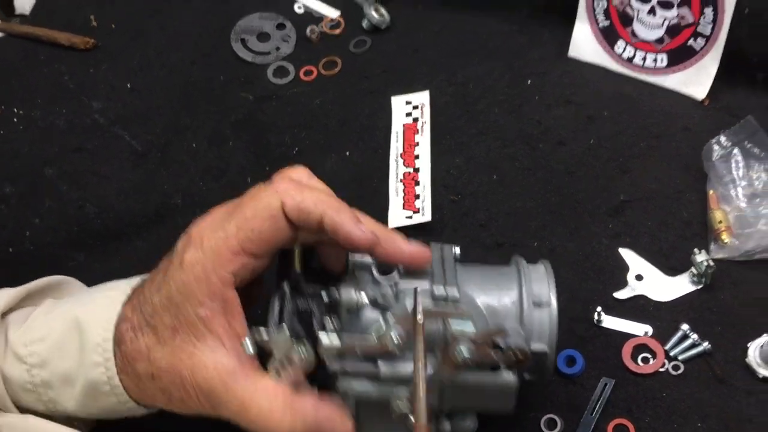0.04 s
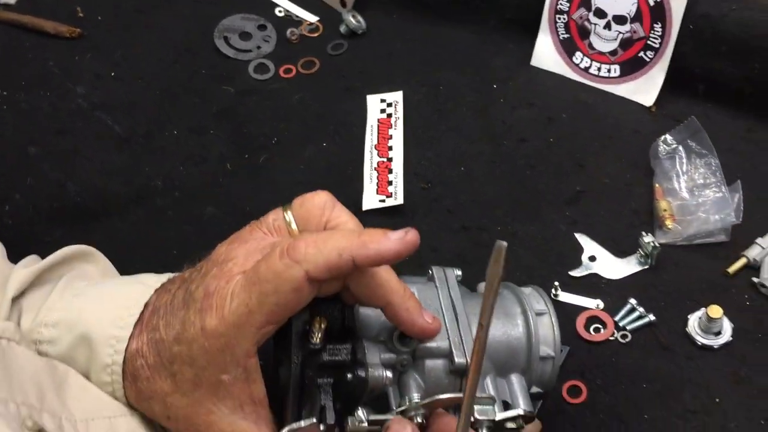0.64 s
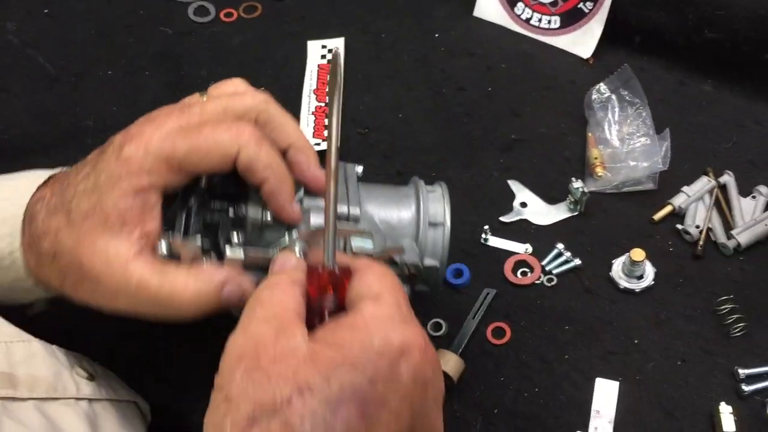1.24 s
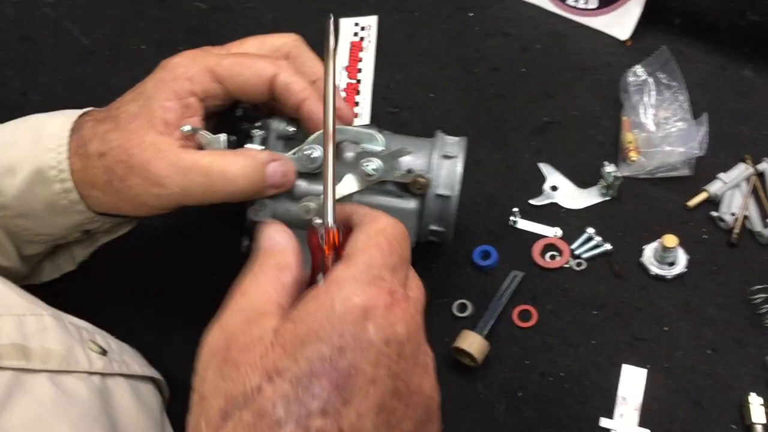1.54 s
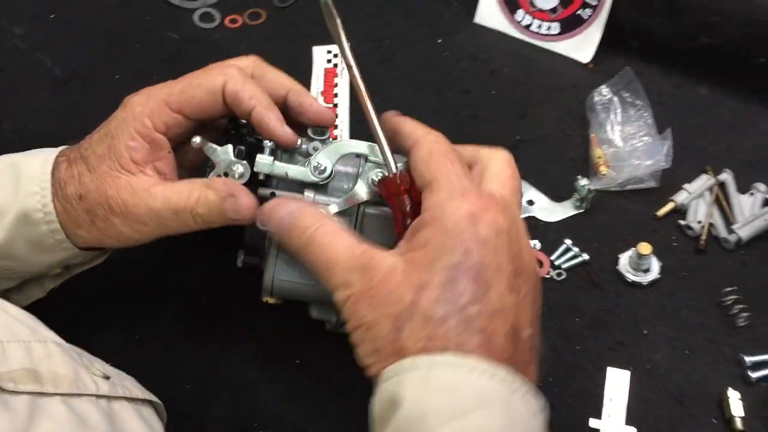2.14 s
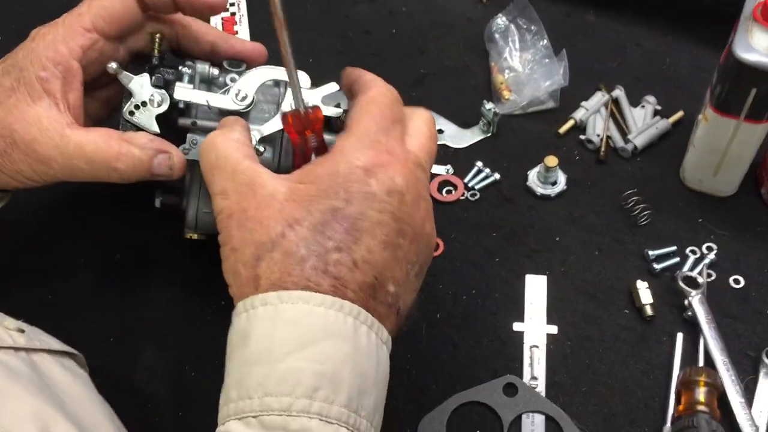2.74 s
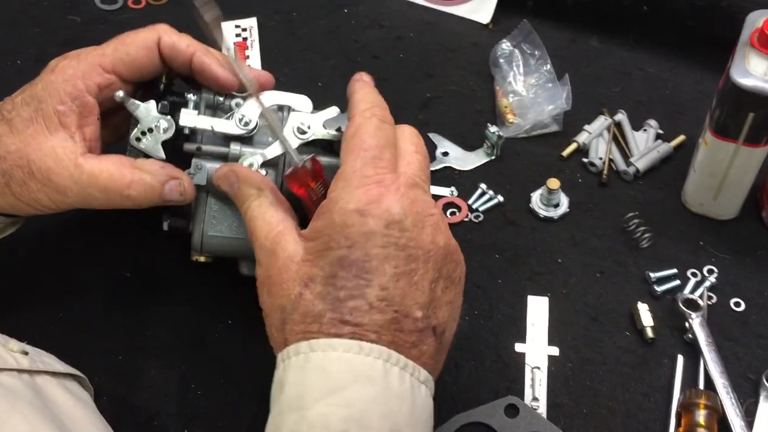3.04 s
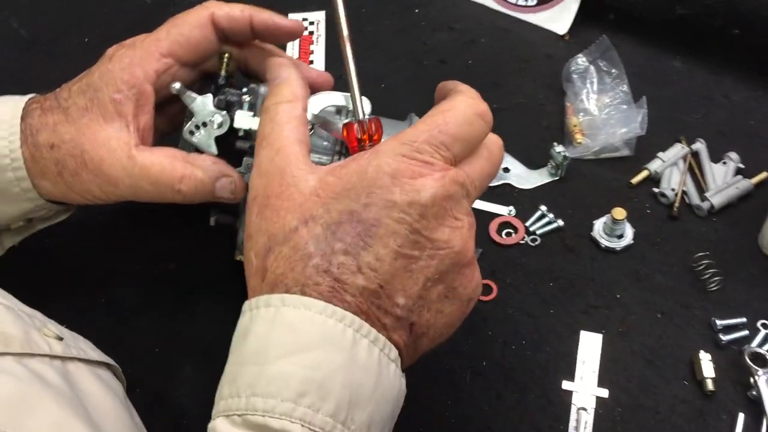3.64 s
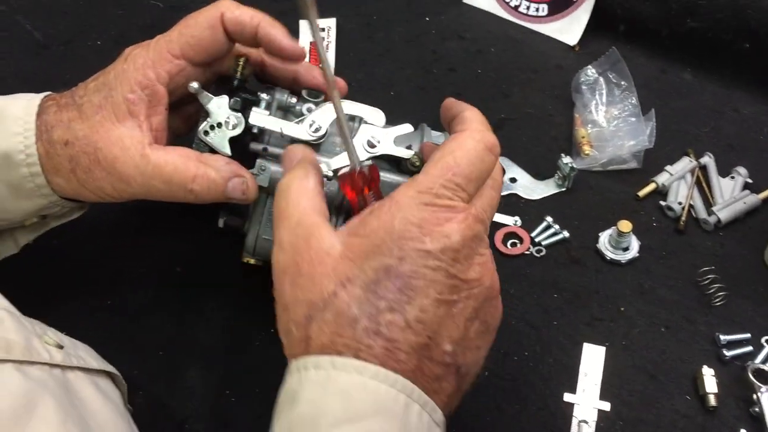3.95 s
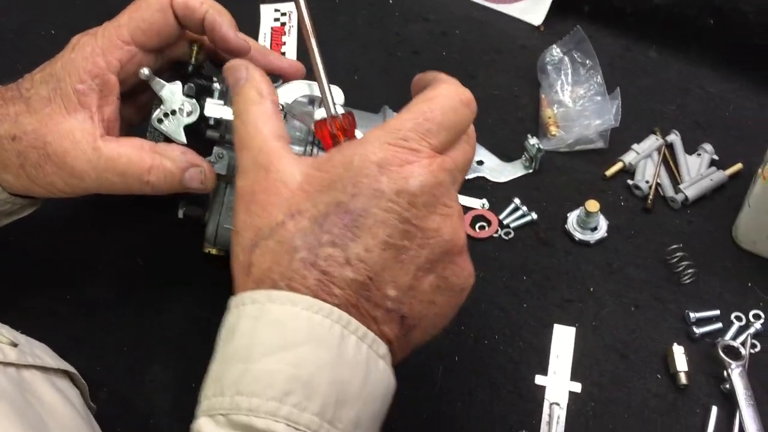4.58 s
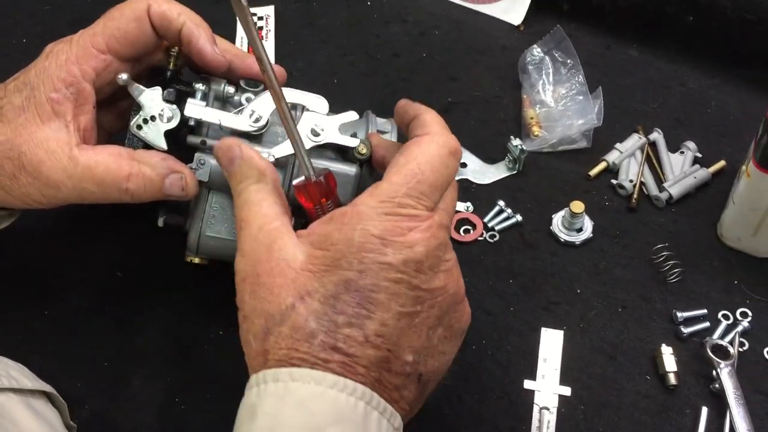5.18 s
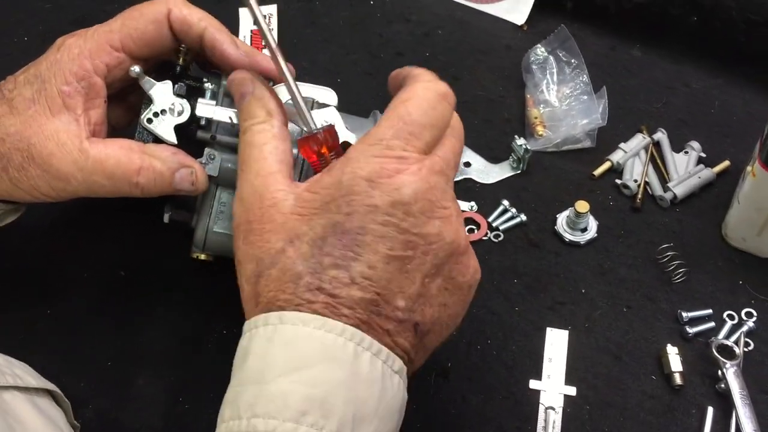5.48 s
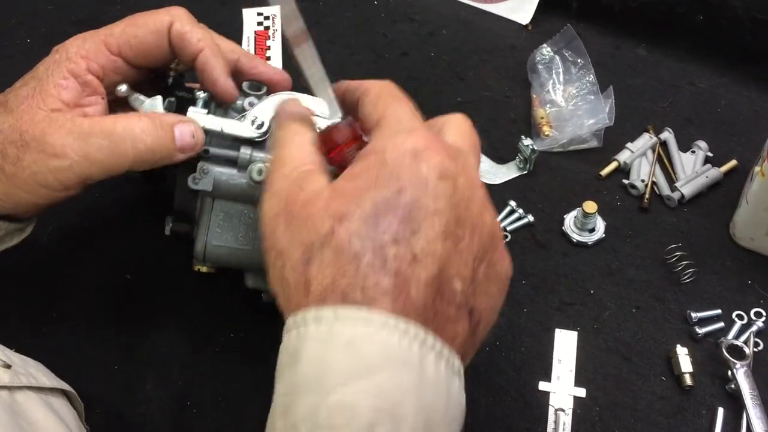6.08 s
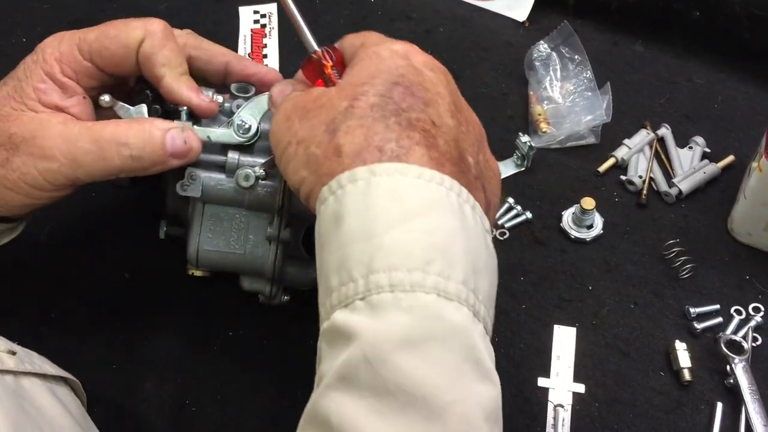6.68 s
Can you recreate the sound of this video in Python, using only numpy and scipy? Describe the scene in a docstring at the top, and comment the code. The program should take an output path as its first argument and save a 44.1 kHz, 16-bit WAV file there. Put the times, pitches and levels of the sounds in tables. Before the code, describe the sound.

A dull knock and a thin scrape, then small clusters of sharp metallic clicks as a screwdriver twists a carburetor screw over low hum.

```python
"""A screwdriver turns a small screw on a hand-held carburettor, close by, in a quiet, humming workshop.
First tool and linkage tick lightly. At 1.5 s the casting knocks on the covered bench, jolting loose parts,
and the small room booms. The blade then drags toward the slot, scraping and singing by stick-slip friction.
From about 3.3 s come six twists: in each the blade grinds and snaps against the slot two or three times,
and every impact excites the bright modes of the steel parts and the dull ones of the hollow casting."""
import sys
import numpy as np
from scipy import signal
from scipy.fft import rfft, irfft
from scipy.io import wavfile
from scipy.ndimage import uniform_filter1d

SR = 44100
rng = np.random.default_rng(int(sys.argv[2]) if len(sys.argv) > 2 else 0)


def unload_wav(signal):
    """Save mono or channel-first audio to the path in sys.argv[1] as 16-bit WAV at rate SR, clipped to [-1, 1]."""
    wavfile.write(
        sys.argv[1],
        SR,
        np.round(np.clip(np.atleast_2d(signal).T, -1, 1) * 32767).astype(np.int16),
    )


N = 305172
RING_S = np.arange(SR // 3) / SR  # time since a blow

# machine hum and a faint whine: pitch_hz, rms_db, waver_db
HUM_PARTIALS = [(50.9, -46.5, 0.8), (99.9, -56.5, 4.5), (112.4, -58, 2.5), (149.5, -65, 3),
                (202.2, -70.5, 4.5), (261.6, -68.5, 3), (3554, -86.5, 0.8)]
# spectra of the workshop's still air and of its reflections: frequency_hz, gain_db
AIR_SPECTRUM = [(20, -28.5), (40, -12), (70, 1.5), (110, -0.5), (170, -8), (290, -7.5), (380, -18),
                (520, -26), (1200, -29.5), (2800, -36.5), (4200, -39), (9000, -43), (10500, -45.5),
                (16000, -46.5)]
ROOM_SPECTRUM = [(80, -2.5), (300, 6), (800, 5.5), (3000, 2), (7500, -0.5), (11000, -1.5), (16000, -9)]
# modes of the room and of the bench top under its cloth: pitch_hz, gain_db, t60_s
ROOM_MODES = [(98, -25.5, 0.2), (103.7, -28, 0.2)]
BENCH_MODES = [(77, -10.5, 0.022), (94.7, -13.5, 0.17), (122, -37, 0.079), (194.7, -16, 0.067),
               (236, -20.5, 0.096), (305.5, -19.5, 0.088), (418, -28.5, 0.081), (670, -30, 0.074),
               (1040, -26, 0.017)]
# loose parts jolted by the knock: start_s, level_db, centre_hz, width_octaves, t60_s
LOOSE_PARTS = [(1.5208, -32, 1620, 0.34, 0.017), (1.5202, -29.5, 3800, 0.66, 0.036),
               (1.5285, -32, 790, 1.26, 0.094)]
# light touches of tool and linkage: start_s, level_db, centre_hz, width_octaves
LIGHT_TOUCHES = [(0.353, -52.5, 1530, 1.24), (1.2889, -44.5, 1660, 1.04), (1.4156, -61.5, 4770, .8),
                 (1.6976, -48.5, 2360, 0.6), (1.9108, -50, 3000, 3), (2.0366, -65, 7000, 0.54),
                 (2.316, -42.5, 1780, 1.53), (2.611, -55.5, 2120, .45), (4.852, -49.5, 2600, 1.3),
                 (5.286, -48.5, 3500, 6)]
# scrape of the blade seeking the slot: time_s, level_db
DRAG_LEVELS = [(1.53, -83), (1.72, -67), (1.765, -55), (1.81, -66.5), (1.903, -70.5), (1.913, -48),
               (1.945, -44.5), (1.96, -55.5), (2.02, -71), (2.12, -94), (2.33, -85), (2.42, -76.5),
               (2.68, -83), (2.75, -75), (2.85, -100)]
# resonances of the dragged steel: centre_hz, width_octaves, gain_db
SINGING_BANDS = [(2300, .14, 3.5), (4100, 0.14, -4)]
# grinding grows with force, then levels off: force_db, level_db
GRIND_BY_FORCE = [(-50.5, -71.5), (-37, -64.5), (-29.5, -51.5), (-15, -48.5)]
# modes of the hollow casting, damped by the hand: pitch_ratio, gain_db, t60_s
CASTING_MODES = [(.5, -7, 0.018), (.88, 2, 0.015), (1.04, 3, 0.02), (1.32, -5, .028), (1.6, -11, 0.0095)]
# a harder blow sounds the casting lower, down to its deepest note: level_db, pitch_hz
PITCH_BY_LEVEL = [(-41.5, 1050), (-29.5, 831), (-26, 680)]
# clearest modes of the steel parts: pitch_hz, gain_db, t60_s
LEVER_RING = [(1375, -3, .026), (1745, 0, .028), (1880, -4, .022)]
SHAFT_RING = [(2310, -3, .026), (2622, -1, .04), (2895, 0, .042), (3090, 0, .034), (3370, -4, .035),
              (4250, -3, .042), (4580, -6, .026), (5065, -2, .03)]
TIP_RING = [(5855, -5, .033), (6230, -4, .027), (6830, -1, .03), (7070, 0, .034), (7350, -4, .025),
            (8470, -2, .024), (9000, -3, .022), (9890, -2, .025), (11980, -3, .02), (13150, -1, .023)]
# spectra of their dense, short-lived modes: frequency_hz, gain_db
LEVER_SPECTRUM = [(300, -25.5), (800, -7), (1400, -2), (1800, -4.5), (2200, -8), (3500, -29.5)]
SHAFT_SPECTRUM = [(1200, -16), (2200, -11.5), (3000, 1.5), (3800, -6.5), (4500, -2.5), (5300, -9),
                  (7000, -14.5)]
TIP_SPECTRUM = [(3000, -35), (5000, -10.5), (6200, 0.5), (7300, -0.5), (9000, 2), (10400, -6), (11800, -1),
                (13000, -2), (14200, -1.5), (15500, -7), (17000, -16)]
# blade snaps, with gains relative to the shaft:
# start_s, shaft_level_db, casting_gain_db, lever_gain_db, tip_gain_db, favoured_shaft_hz
BLADE_SNAPS = [(3.2828, -41, 1, -4, -6, 3370), (3.3598, -25.5, 6, -12.5, 1, 3370),
               (3.8237, -34.5, 6, -2.5, -1, 3370), (3.8731, -36.5, -5.5, -4.5, -2, 3370),
               (3.9067, -27.5, -10, -2, 1.5, 3100), (4.3086, -44, 4, -1.5, -8, 3370),
               (4.387, -21.5, 6, -15.5, -2, 2950), (4.814, -28.5, -3.5, -5, -8.5, 4445),
               (4.8856, -27.5, -6, -0.5, 6, 3030), (5.4364, -54, -8, -6, -3.5, 3340),
               (5.4850, -21.5, 3.5, -5, 2.5, 2622), (5.8471, -33.5, 5, -1, -4, 4210),
               (5.9130, -23.5, -6, .5, 4, 2878)]


def amp(db):
    """Amplitude ratio for a level in decibels."""
    return 10 ** (np.asarray(db) / 20)


def add(track, start_s, sound):
    """Superposition: a sound sums into the track."""
    i = int(start_s * SR)
    track[i:i + len(sound)] += sound[:N - i]


def colour(x, spectrum, size=8192):
    """Minimum-phase filtering through (frequency_hz, gain_db) points, by the folded cepstrum."""
    hz, db = np.transpose(spectrum)
    bins_hz = np.maximum(np.fft.rfftfreq(size, 1 / SR), 1)
    gain = amp(np.interp(np.log(bins_hz), np.log(hz), db))
    cepstrum = irfft(np.log(gain))
    cepstrum[1:size // 2] *= 2
    cepstrum[size // 2 + 1:] = 0
    return signal.fftconvolve(x, irfft(np.exp(rfft(cepstrum))))[:len(x)]


def resonate(x, hz, octaves):
    """Resonance: a band with steep skirts passes around a centre frequency."""
    grid_hz = np.geomspace(20, SR / 2, 240)
    gain_db = -40 * np.log10(1 + .5 * (np.log2(grid_hz / hz) / octaves) ** 2)
    return colour(x, np.column_stack([grid_hz, gain_db]))


def level(x, db=0):
    """A sustained sound is scaled by its rms level."""
    return x * amp(db) / np.sqrt(np.mean(x ** 2))


def blow(x, db=0):
    """A transient is scaled by its energy, as if spread over 5 ms."""
    return x * amp(db) / np.sqrt(np.sum(x ** 2) / (SR / 200))


def fade(t60):
    """Damping: exponential decay by 60 dB in t60 seconds."""
    return np.exp(-np.log(1000) * RING_S / t60)


def rise(rise_s):
    """Vibration builds exponentially toward full amplitude."""
    return 1 - np.exp(-RING_S / rise_s)


def ring(modes):
    """Free vibration is a sum of damped sinusoids."""
    return sum(amp(db) * fade(t60) * np.sin(2 * np.pi * hz * RING_S) for hz, db, t60 in modes)


def dense_modes(t60):
    """Modal overlap: modes too close to resolve act as decaying noise."""
    return rng.standard_normal(len(RING_S)) * fade(t60)


def drift(rate_hz):
    """Smoothed noise gives a slow fluctuation of unit spread."""
    hold = int(SR / rate_hz)
    steps = np.repeat(rng.standard_normal(N // hold + 1), hold)
    slow = uniform_filter1d(uniform_filter1d(steps, hold), hold)
    return slow[:N] / np.std(slow)


def workshop():
    """Slow phase and amplitude modulation makes the hum waver over soft rumble and hiss."""
    t = np.arange(N) / SR
    hum = np.zeros(N)
    for hz, db, waver_db in HUM_PARTIALS:
        phase = 2 * np.pi * hz * t + 0.2 * waver_db * drift(6)
        hum += level(np.sin(phase) * amp(waver_db * drift(8)), db)
    return hum + level(colour(rng.standard_normal(N), AIR_SPECTRUM), db=-53.5)


def room(x, wet_db, t60=0.28, build_s=0.0035):
    """Reverberation: diffuse reflections build up after the direct sound and soon die."""
    tail = colour(dense_modes(t60), ROOM_SPECTRUM) * (1 - np.exp(-(RING_S / build_s) ** 2))
    tail /= np.sqrt(np.sum(tail ** 2))
    return x + amp(wet_db) * signal.fftconvolve(x, tail)[:N]


def steel(modes, scatter_db=2):
    """The point of contact sets each mode's sign and strength, here drawn by chance."""
    return sum(rng.choice([-1, 1]) * ring([(hz, db + scatter_db * rng.uniform(-0.89, 1), t60)])
               for hz, db, t60 in modes)


def tap(hz, octaves, t60, modes_db, rise_s):
    """A light impact excites only one band of the steel's modes."""
    hit = blow(dense_modes(t60)) + blow(steel(LEVER_RING + SHAFT_RING), modes_db)
    return resonate(hit * rise(rise_s), hz, octaves)


def touches(reference_db=-51.5, doubling_db=14):
    """Light impacts of tool and linkage on the casting: a firmer one rings longer."""
    out = np.zeros(N)
    for start_s, db, hz, octaves in LIGHT_TOUCHES:
        t60 = 0.041 * 2 ** ((db - reference_db) / doubling_db)
        add(out, start_s, blow(tap(hz, octaves, t60, modes_db=-12.5, rise_s=0.0011), db))
    return out


def knock(start_s=1.5195, cloth_s=0.0021, boom_delay_s=0.066):
    """An impact cushioned by cloth excites loose parts, the bench, then the room's standing waves."""
    out = np.zeros(N)
    for jolt_s, db, hz, octaves, t60 in LOOSE_PARTS:
        add(out, jolt_s, blow(tap(hz, octaves, t60, modes_db=-27, rise_s=0.00014), db))
    thud = ring(BENCH_MODES) * rise(cloth_s)
    high_pass = signal.butter(2, 55, "high", fs=SR, output="sos")
    add(out, start_s, -signal.sosfilt(high_pass, thud))
    boom = amp(-2) * ring(ROOM_MODES) * rise(0.022)
    add(out, start_s + boom_delay_s, boom)
    return out


def friction(size, grain_db=4, slips_per_s=3000, modes_db=-14):
    """Stick-slip friction: dense, uneven pulses drive the metal's impulse response."""
    slips = (rng.random(size) < slips_per_s / SR) * rng.choice([-1, 1], size)
    strengths = amp(grain_db * rng.standard_normal(size))
    metal = blow(signal.unit_impulse(len(RING_S))) + blow(steel(LEVER_RING + SHAFT_RING), modes_db)
    return signal.fftconvolve(slips * strengths, metal)[:size]


def seeking(waver_db=1.5, sing_db=-64, knee_db=-62):
    """Friction drives narrow resonances; under pressure this singing saturates and a scrape takes over."""
    drag = amp(np.interp(np.arange(N) / SR, *np.transpose(DRAG_LEVELS), left=-np.inf, right=-np.inf))
    scrape = level(resonate(friction(N, grain_db=6), hz=2000, octaves=1.5))
    singing = sum(level(resonate(friction(N), hz, octaves), db) * amp(waver_db * drift(20))
                  for hz, octaves, db in SINGING_BANDS)
    saturation = drag / np.hypot(drag, amp(knee_db))
    return drag * scrape + amp(sing_db) * saturation * singing


def casting_pitch(db):
    """The casting's pitch in hertz falls as the blow's level rises."""
    return np.interp(db, *np.transpose(PITCH_BY_LEVEL))


def slides(twist_gap_s=.1, lead_s=.04, octaves_per_hz=0.00096):
    """Sliding friction: the blade grinds into each snap at a level that follows its force."""
    out = np.zeros(N)
    last_s, last_db = -np.inf, 0
    for snap_s, db, casting_db, *_ in BLADE_SNAPS:
        force_db = db + 10 * np.log10(1 + amp(casting_db) ** 2)  # power sum of shaft and casting
        grind_db = np.interp(force_db, *np.transpose(GRIND_BY_FORCE))
        if snap_s - last_s < twist_gap_s:  # within a twist the force carries over
            start_s, from_db, to_db = last_s, last_db, grind_db
        else:  # a new twist builds from rest
            start_s, from_db, to_db = snap_s - lead_s, grind_db - 26, grind_db - 12
        size = int((snap_s - start_s) * SR)
        centre_hz = 1.3 * casting_pitch(db + casting_db)
        grind = level(resonate(friction(size, modes_db=-9), centre_hz, octaves_per_hz * centre_hz))
        envelope = amp(np.linspace(from_db, to_db, size)) * signal.windows.tukey(size, 0.18)
        add(out, start_s, grind * envelope)
        last_s, last_db = snap_s, grind_db
    return out


def casting_clunks(rise_s=.0022):
    """Inertia: the heavier casting answers each snap more slowly, in dull, heavily damped modes."""
    out = np.zeros(N)
    for start_s, db, casting_db, *_ in BLADE_SNAPS:
        hz = casting_pitch(db + casting_db)
        clear = sum((-1) ** k * ring([(hz * ratio, gain_db, t60)])
                    for k, (ratio, gain_db, t60) in enumerate(CASTING_MODES))
        dense = resonate(dense_modes(t60=0.031), hz, octaves=0.56)
        clunk = (blow(clear) + blow(dense, db=-7)) * rise(rise_s)
        add(out, start_s, blow(clunk, db + casting_db))
    return out


def favour(modes, centre_hz, boost_db=8.0, width_hz=150):
    """Selective excitation: the place of contact drives one mode more than its neighbours."""
    return [(hz, db + boost_db * np.exp(-((hz - centre_hz) / width_hz) ** 2), t60)
            for hz, db, t60 in modes]


def clack(modes, spectrum, dense_t60, modes_db, rise_s=0.00081):
    """Impact response of a steel part: a few clear modes among a crowd of short ones."""
    dense = blow(colour(dense_modes(dense_t60), spectrum))
    return (dense + blow(steel(modes), modes_db)) * rise(rise_s)


def snaps():
    """Impulsive excitation: the blade jumps against the slot wall; lever, shaft and tip ring at once."""
    out = np.zeros(N)
    for start_s, db, _, lever_db, tip_db, shaft_hz in BLADE_SNAPS:
        lever = clack(LEVER_RING, LEVER_SPECTRUM, dense_t60=0.042, modes_db=-2)
        shaft = clack(favour(SHAFT_RING, shaft_hz), SHAFT_SPECTRUM, dense_t60=0.043, modes_db=-3)
        tip = clack(TIP_RING, TIP_SPECTRUM, dense_t60=0.033, modes_db=-3.5)
        add(out, start_s, amp(db) * (blow(lever, lever_db) + blow(shaft) + blow(tip, tip_db)))
    return out


def scene():
    """Handwork and hum superpose; the cupped hand keeps the casting's clunk drier than the steel."""
    handwork = snaps() + slides() + touches() + seeking() + knock()
    return (room(handwork, wet_db=-23) + room(casting_clunks(), wet_db=-25.5) + workshop())[None]


def record(dry, cutoff_hz=15750):
    """Band limiting: a steep low-pass filter removes the highest treble."""
    return signal.sosfilt(signal.ellip(8, .2, 70, cutoff_hz, fs=SR, output="sos"), dry)


dry = scene()
out = record(dry)
unload_wav(out)
```